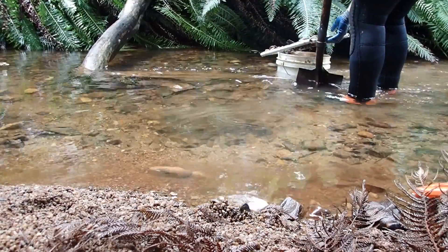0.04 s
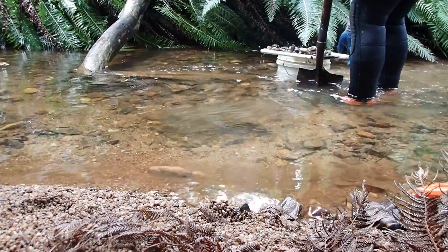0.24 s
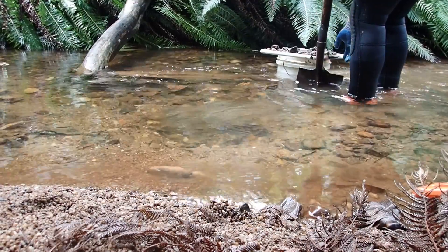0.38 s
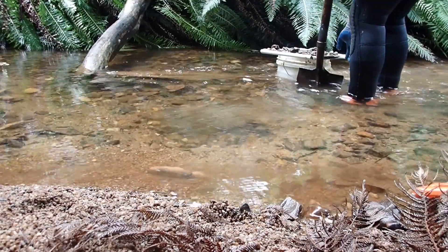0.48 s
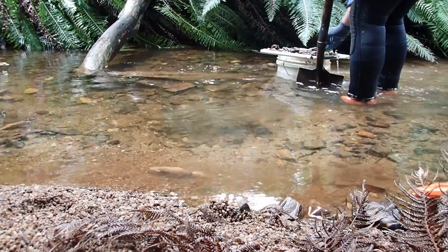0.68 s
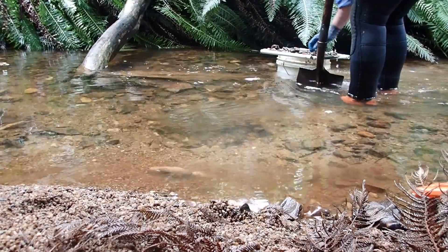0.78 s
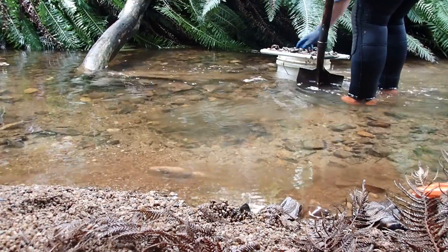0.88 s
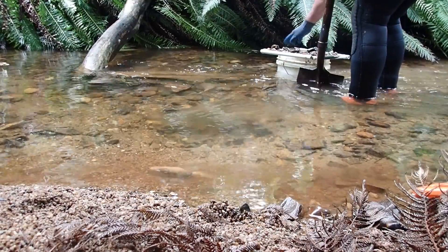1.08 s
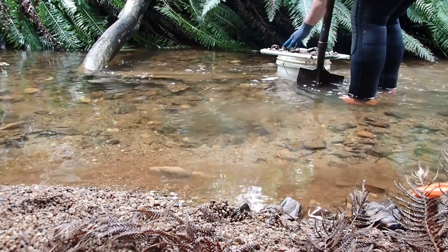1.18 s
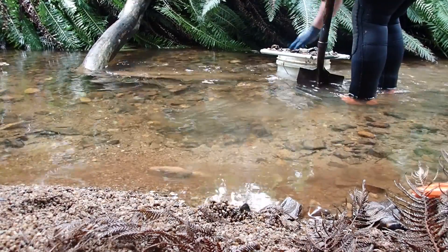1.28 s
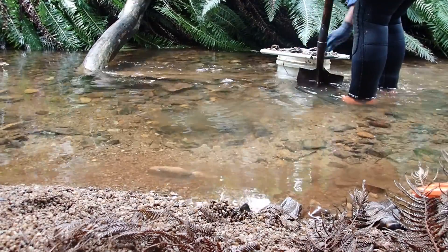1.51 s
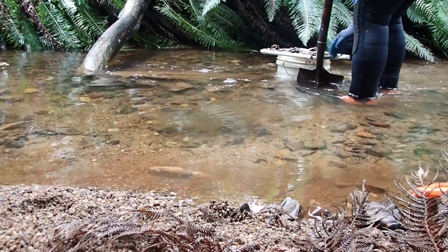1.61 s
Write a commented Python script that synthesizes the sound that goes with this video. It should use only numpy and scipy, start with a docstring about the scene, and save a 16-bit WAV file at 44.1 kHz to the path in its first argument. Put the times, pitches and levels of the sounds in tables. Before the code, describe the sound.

Close, gritty crunching of gravel in a sieve: the load lands with a thump and settles, a stone plops into water, then a hand stirs the clicking pebbles. A shallow creek gurgles quietly throughout.

```python
"""A shallow creek, with a stereo microphone close to a sieve that rests on a bucket.
Wet gravel drops into the sieve with a thud and is raked about by hand: pebbles knock on each other
and set the sieve ringing, grit crackles between them, and one stone plops into the water.
The creek ripples all around; the banks give back a faint, short echo."""
import sys
import numpy as np
from scipy import signal
from scipy.fft import rfft, irfft
from scipy.io import wavfile
from scipy.ndimage import uniform_filter1d

SR = 44100
rng = np.random.default_rng(int(sys.argv[2]) if len(sys.argv) > 2 else 0)


def dump_mix(stems):
    """Bounce the given channels to the path in sys.argv[1] as a 16-bit WAV at rate SR."""
    frames = np.atleast_2d(stems).T  # one column per channel
    limited = np.clip(frames, -1, 1)  # hard clip at full scale
    pcm = np.round(limited * 32767).astype(np.int16)
    wavfile.write(sys.argv[1], SR, pcm)


N = 72765
T = np.arange(N) / SR
FFT_SIZE = 92160
HZ = np.maximum(np.fft.rfftfreq(FFT_SIZE, 1 / SR), 1)
SHARE_SAMPLES = int(.0098 * SR)   # contacts share the work of the hand over this span


def from_db(db):
    """Decibels to gain."""
    return np.exp(np.asarray(db) * (np.log(10) / 20))


def at_hz(points):
    """A table read along log frequency."""
    hz, value = np.transpose(points)
    return np.interp(np.log(HZ), np.log(hz), value)


def through(x, response):
    """Filter by a frequency response."""
    return irfft(rfft(x, FFT_SIZE) * response, FFT_SIZE)[..., :N]


def unit_power(response):
    """Scale a filter so that white noise keeps its level."""
    return response / np.sqrt(np.mean(np.abs(response) ** 2))


def colour(spectrum):
    """Causal filter of unit power with the given spectral shape."""
    cepstrum = irfft(np.log(from_db(at_hz(spectrum))))
    cepstrum[1:FFT_SIZE // 2] *= 2
    cepstrum[FFT_SIZE // 2 + 1:] = 0
    return unit_power(np.exp(rfft(cepstrum)))


def stereo_noise(correlation):
    """White noise, as alike on left and right as the table says."""
    alike = np.clip(at_hz(correlation), 0, .999)
    mid, side = through(rng.standard_normal((2, N)), np.sqrt(np.array([1 + alike, 1 - alike]) / 2))
    return np.array([mid + side, mid - side])


def swell(peak_s, rise_s, fall_s):
    """An envelope that climbs 20 dB per rise_s to its peak, then drops 20 dB per fall_s."""
    out = np.zeros(N)
    live = slice(*np.searchsorted(T, [peak_s - 4 * rise_s, peak_s + 4 * fall_s]))
    age = T[live] - peak_s
    out[live] = from_db(-20 * np.maximum(-age / rise_s, age / fall_s))
    return out


def impact(spectrum, peak_s, level_db, fall_s):
    """One short burst of noise with a sudden start."""
    burst = swell(peak_s, .00046, fall_s) * rng.standard_normal(N)
    return from_db(level_db) * through(burst, colour(spectrum))


def bubble(start_s, pitch_hz, level_db, t60_s, glide_per_s=3.1):
    """An air pocket rings as a dying sine, its pitch rising as it nears the surface."""
    out = np.zeros(N)
    live = slice(*np.searchsorted(T, [start_s, start_s + t60_s]))
    age = T[live] - start_s
    level = from_db(level_db - 60 * age / t60_s) * (1 - np.exp(-4 * pitch_hz * age))
    out[live] = -level * np.sin(2 * np.pi * pitch_hz * age * (1 + glide_per_s * age / 2))
    return out


# Running water all around the microphone: frequency_hz, relative_db
CREEK_SPECTRUM = [(25, -21), (60, -9), (105, -1.5), (160, -3.5), (300, 0.5), (480, -6.5), (650, -5.5),
                  (850, -1.5), (1050, -5.5), (2300, -8), (3100, -15), (6500, -19), (7700, -12.5),
                  (8400, -16), (9300, -23.5), (15000, -24)]
# How alike the water is on left and right: frequency_hz, correlation
CREEK_CORRELATION = [(30, .3), (60, .5), (150, .55), (380, 0.74), (950, 0.83), (2380, 0.7), (6000, 0.24),
                     (15000, .15)]


def creek(gurgles_per_s=50, low_hz=95.6, high_hz=1710):
    """A soft wash of running water, with small bubbles gurgling from left to right at random."""
    water = from_db(-43) * through(stereo_noise(CREEK_CORRELATION), colour(CREEK_SPECTRUM))
    for when, pitch, size, pan in rng.random((int(gurgles_per_s * N / SR), 4)):
        pitch_hz = low_hz * (high_hz / low_hz) ** np.sqrt(pitch)
        gurgle = bubble(when * N / SR, pitch_hz, level_db=-57 + 10 * size, t60_s=23 / pitch_hz)
        water += gurgle * np.array([[.5 + pan], [1.5 - pan]])
    return water


# How alike the gravel and its echo are on left and right: frequency_hz, correlation
NARROW_CORRELATION = [(200, .995), (1900, 1), (2700, 0.86), (3500, .95), (5000, .86), (8000, .85),
                      (14000, .68)]


def narrow_noise():
    """Noise with the narrow image of a close source, a little wider in the treble."""
    return stereo_noise(NARROW_CORRELATION)


def bank_echo(close, level_db=-22, t60_s=.25, build_s=.0097):
    """The banks and ferns scatter a diffuse echo back to the microphone."""
    tail = narrow_noise() * from_db(-60 * T / t60_s) * (1 - np.exp(-T / build_s))
    return from_db(level_db) * through(close, unit_power(rfft(tail, FFT_SIZE)))


# A stone slapping the water nearby: frequency_hz, relative_db
SPLASH_SPECTRUM = [(25, -48), (110, -27), (300, 0), (620, 2), (950, -13), (2200, -12.5), (5400, -12),
                   (6500, -22), (10000, -23), (16000, -40)]
# Air pockets ringing in the water: start_s, pitch_hz, level_db, t60_s
AIR_POCKETS = [(.002, 92, -44, .16), (.09, 374, -41.5, 0.26), (0.389, 105.7, -46, .22),
               (.6066, 324, -17.5, .15), (.685, 274, -40, 0.17), (.752, 260, -43, 0.17),
               (1.175, 304, -36.5, .1)]


def plops():
    """A stone slaps the water and leaves a ringing air pocket; smaller ones gulp in the current."""
    slap = impact(SPLASH_SPECTRUM, peak_s=.6066, level_db=-22.5, fall_s=.008)
    return slap + sum(bubble(*pocket) for pocket in AIR_POCKETS)


# The dull landing of the load: frequency_hz, relative_db
THUD_SPECTRUM = [(20, -8), (120, -4), (400, 5), (800, -2.5), (3000, -36), (16000, -62)]


def load_thud():
    """The weight of the load hits the sieve."""
    return impact(THUD_SPECTRUM, peak_s=.233, level_db=-33, fall_s=.025)


# The bright tone of grit at close range: frequency_hz, relative_db
GRIT_SPECTRUM = [(500, -24), (2000, -3), (3700, 0), (4700, -1.5), (5400, 2), (6700, -4.5), (7500, 3.5),
                 (8400, 0.5), (9200, -11.5), (11500, -13), (14200, -10), (16000, -20)]
# Single grains breaking: peak_s, level_db
GRAIN_SNAPS = [(.2315, -18), (.273, -26), (.524, -36), (.788, -40), (.828, -36), (.903, -25), (1.129, -27),
               (1.134, -28), (1.153, -32), (1.195, -39), (1.29, -30), (1.33, -26), (1.461, -32)]


def grit_snaps():
    """Single grains break with a bright tick."""
    level = sum(from_db(db) * swell(peak_s, rise_s=.0005, fall_s=.016) for peak_s, db in GRAIN_SNAPS)
    return through(level * narrow_noise(), colour(GRIT_SPECTRUM))


# Larger pebbles that stand out of the load: peak_s, relative_db, rise_s, fall_s, pitch_hz
PEBBLE_RATTLES = [(.1905, -28, .001, .018, 1600), (.235, -6, .004, .015, 1700),
                  (.277, -10, .004, .03, 1600), (.349, -12, .004, .022, 1700),
                  (.416, -25, .006, .025, 1900), (.464, -21, .003, .025, 1500),
                  (.533, -25, .003, .02, 1500), (.671, -36, .002, .04, 1450), (.703, -32, .004, .02, 1350),
                  (.776, -37, .008, .03, 1300), (.802, -26, .001, .022, 1300), (.838, -27, .08, .07, 1270),
                  (1.135, -18, .006, .014, 2000), (1.195, -22, .001, .018, 2050),
                  (1.322, -23, .003, .035, 2150), (1.3455, -11, .003, .014, 1950),
                  (1.586, -29, .012, .02, 1500), (1.622, -28, .025, .025, 1550)]


def big_pebbles(gain_db=-3, band_hz=(750, 2900)):
    """Each larger pebble knocks or scrapes with a broad resonance of its own."""
    out = np.zeros(N)
    for peak_s, db, rise_s, fall_s, pitch_hz in PEBBLE_RATTLES:
        resonance = signal.iirpeak(pitch_hz, Q=2, fs=SR)
        rattle = signal.lfilter(*resonance, rng.standard_normal(N))
        rattle /= np.sqrt(uniform_filter1d(rattle ** 2, SHARE_SAMPLES) + 1e-12)
        out += from_db(db + gain_db) * swell(peak_s, rise_s, fall_s) * rattle
    return signal.sosfilt(signal.butter(2, band_hz, "band", fs=SR, output="sos"), out)


def contacts(per_s, spread_db, decay_s):
    """Stones touch in random clicks of uneven size, held to a steady mean level."""
    sizes = from_db(spread_db * np.minimum(rng.exponential(1, N), 4))
    energy = (rng.random(N) < per_s / SR) * sizes ** 2
    pole = np.exp(-2 / (decay_s * SR))
    envelope = np.sqrt(signal.lfilter([1 - pole], [1, -pole], energy + 1e-9))
    clicks = envelope * narrow_noise()
    power = np.mean(clicks ** 2, axis=0)
    mean_power = uniform_filter1d(uniform_filter1d(power, SHARE_SAMPLES), SHARE_SAMPLES)
    return clicks / np.sqrt(mean_power + 1e-9)


# Modes of the loaded sieve on its bucket: pitch_hz, width_hz, relative_db
SIEVE_MODES = [(756, 48, -5), (857, 40, 0), (940, 47, -5), (1213, 45, -3), (1328, 55, 1), (1511, 35, 2),
               (1579, 35, 1), (1761, 58, -5), (1932, 77, -3.5), (2088, 70, -0.5), (2243, 45, 4),
               (2319, 40, 4), (2790, 112, -2.5), (3760, 145, -8)]


def sieve_ring(knocks):
    """Knocks excite the modes of the sieve, which add with alternating polarity."""
    body = sum((-1) ** k * from_db(db) / (1 + 1j * (HZ ** 2 - pitch_hz ** 2) / (HZ * width_hz))
               for k, (pitch_hz, width_hz, db) in enumerate(SIEVE_MODES))
    return through(knocks, unit_power(body))


# Pebble knocking on pebble: frequency_hz, relative_db
KNOCK_SPECTRUM = [(25, -45), (200, -38), (450, -20.5), (640, -11), (850, -0.5), (1050, -6), (1400, 1),
                  (1850, -2.5), (2280, 3), (2520, -4.5), (2800, -2.5), (3300, -8.5), (4500, -13.5),
                  (8000, -24.5), (16000, -41)]
# Close to the microphone the load lands and settles; the hand sweeps, pokes and sweeps again:
# peak_s, relative_db, rise_s, fall_s, grit_over_pebbles_db
GRAVEL_SHIFTS = [ (0.212, -38, 0.1, 1.3, -8), (.233, -5.5, .006, .026, -7),
                 (.246, -11, 0.0185, 0.0675, -5.5), (0.259, -14.5, .007, .085, -8),
                 (.322, -21.5, .04, .07, -8.5), (.358, -18.5, .05, .095, -8), (.413, -24, .02, .07, -10),
                 (.461, -25, .025, .05, -11), (.495, -31, .04, .12, -11), (.529, -34, .015, .05, -5),
                 (0.618, -35, .008, .035, -4), (.83, -34, .05, .1, -6), (.882, -25, .07, .04, -7),
                 (0.913, -16, .035, .035, -5), (.937, -20.5, .025, .08, -4.5), (0.996, -26, 0.024, .06, -7),
                 (1.015, -28, 0.04, .075, -10), (1.076, -22.5, 0.0023, .033, -6.5),
                 (1.103, -28, 0, .028, -6), (1.1295, -28, -0.0066, .03, 4), (1.133, -20, 0.0017, .02, -9),
                 (1.161, -26, 0.0129, .028, -7), (1.221, -33, 0.04, 0.17, -12), (1.262, -26, .06, .08, -12),
                 (1.296, -24, 0.0339, .045, -8), (1.329, -20, .025, .04, -9), (1.344, -14.5, .01, .02, -3),
                 (1.37, -25, 0.0261, .09, -9.5), (1.429, -28, 0.05, .05, -8), (1.49, -29, .09, .1, -9),
                 (1.538, -30, .05, .04, -6), (1.585, -32, 0.07, .016, -10), (1.621, -31, .035, .045, -12)]


def gravel(sieve_db=-1.7, knock_db=-3.2, grit_db=.4):
    """Each shift of the load sets pebbles knocking, the sieve ringing and grit crackling."""
    pebble_power, grit_power = np.zeros((2, N))
    for peak_s, db, rise_s, fall_s, grit_over_pebbles_db in GRAVEL_SHIFTS:
        power = (from_db(db) * swell(peak_s, rise_s, fall_s)) ** 2
        pebble_power += power
        grit_power += power * from_db(grit_over_pebbles_db) ** 2
    on_sieve, on_stone = (np.sqrt(pebble_power) * contacts(per_s=1600, spread_db=2, decay_s=.0012)
                          for _ in range(2))
    on_grit = np.sqrt(grit_power) * contacts(per_s=2800, spread_db=2.6, decay_s=.0026)
    ring = from_db(sieve_db) * sieve_ring(on_sieve)
    knocks = from_db(knock_db) * through(on_stone, colour(KNOCK_SPECTRUM))
    crackle = from_db(grit_db) * through(on_grit, colour(GRIT_SPECTRUM))
    return ring + knocks + crackle


# Level between the two microphone ports: frequency_hz, left_over_right_db
PORT_BALANCE = [(60, 0), (99, -4), (160, -1), (270, -0.5), (450, -1.5), (740, 0.0), (1220, -1.5),
                (2010, 2.0), (3330, -4.0), (5500, -4.0), (9080, -2.0), (15000, -2.0)]
# Phase between the two ports: frequency_hz, left_lead_rad
PORT_PHASE = [(1700, -0.067), (2200, -.55), (2550, -1.4), (3000, 0.76), (3500, 0.34), (4100, -1.04),
              (4700, -.4), (6000, -0.22), (8000, -.35), (13000, -.4)]


def microphone_ports(sound):
    """Sound reaches the left and right ports, each with its own level and phase."""
    sides = np.array([[.5], [-.5]])
    gain = from_db(sides * at_hz(PORT_BALANCE))
    phase = sides * at_hz(PORT_PHASE)
    return through(sound, gain * np.exp(1j * phase))


def scene():
    """Sieve and plops close to the microphone, their echo behind, the creek all around."""
    close = gravel() + big_pebbles() + load_thud() + plops() + grit_snaps()
    return microphone_ports(close + bank_echo(close)) + creek()


def record(dry, overload=1.2, cutoff_hz=15700):
    """The microphone rounds the loudest peaks, and the top of the treble is cut steeply."""
    rounded = overload * np.tanh(dry / overload)
    return through(rounded, 1 / np.sqrt(1 + (HZ / cutoff_hz) ** 400))


dry = scene()
out = record(dry)
dump_mix(out)
```